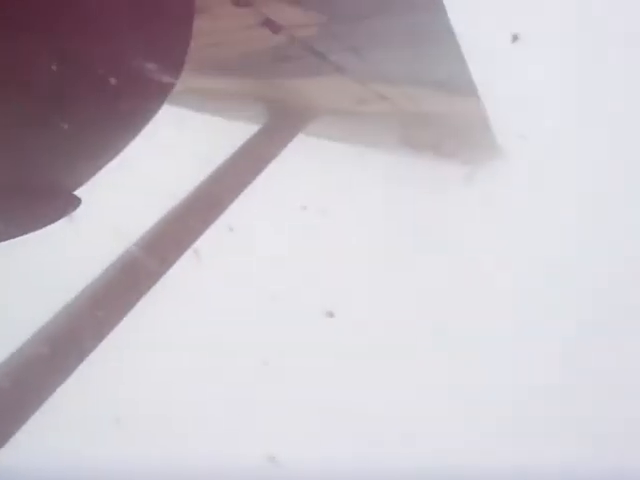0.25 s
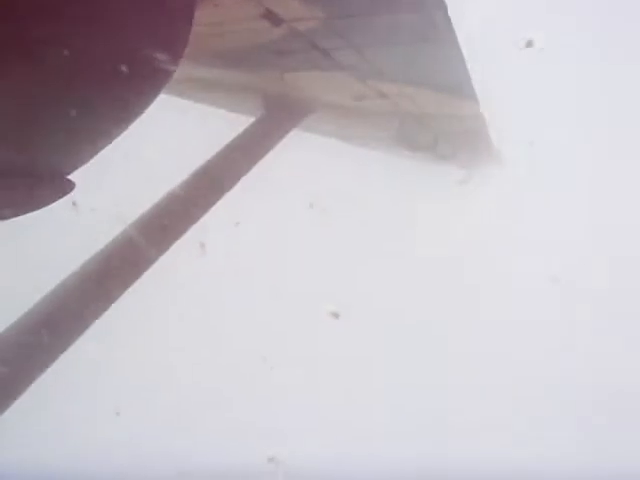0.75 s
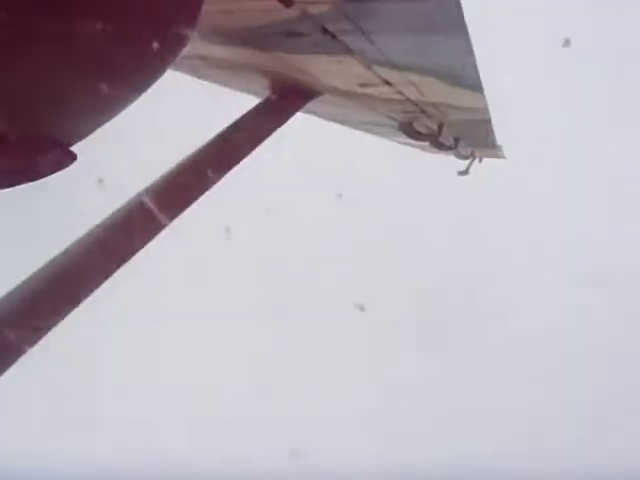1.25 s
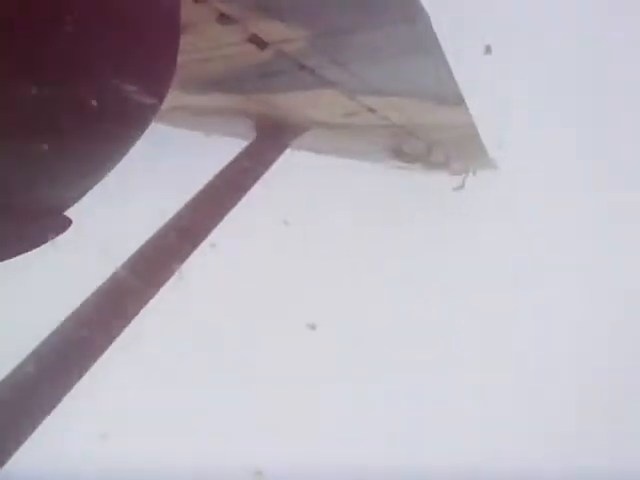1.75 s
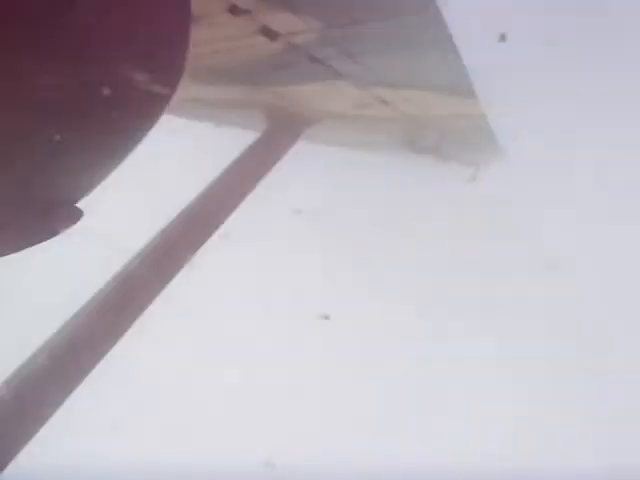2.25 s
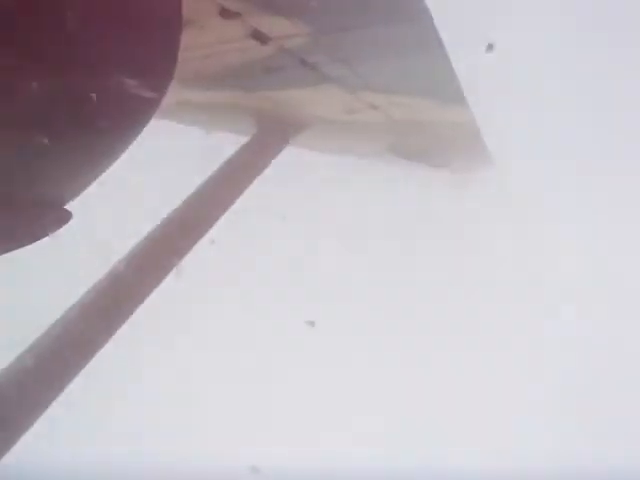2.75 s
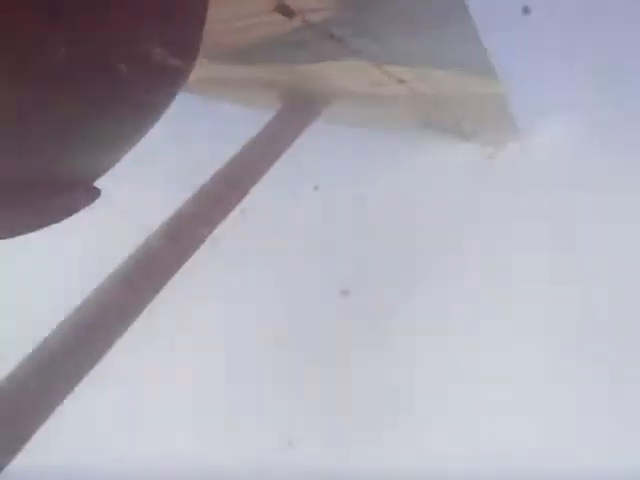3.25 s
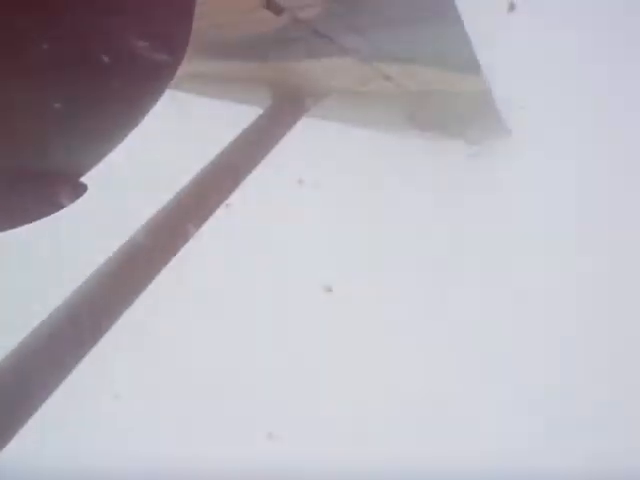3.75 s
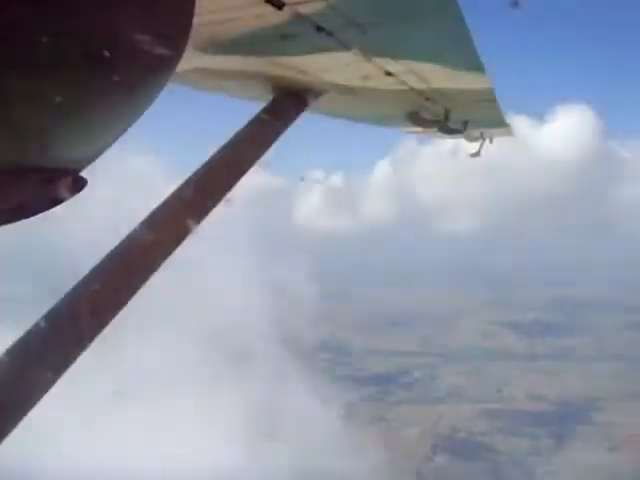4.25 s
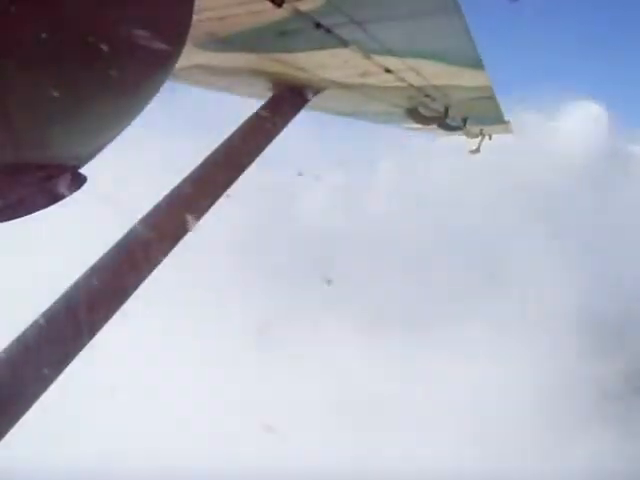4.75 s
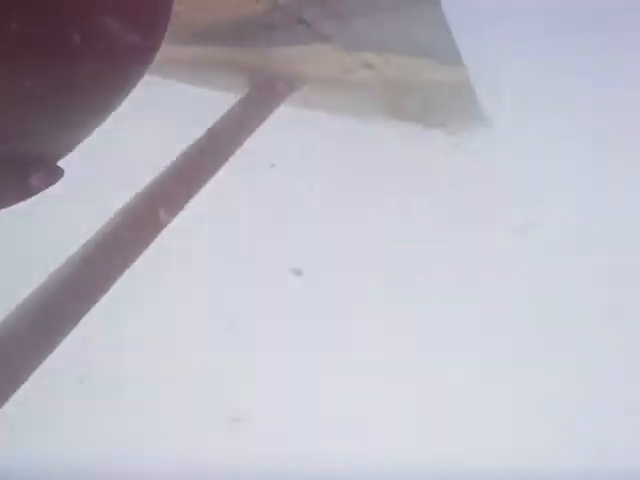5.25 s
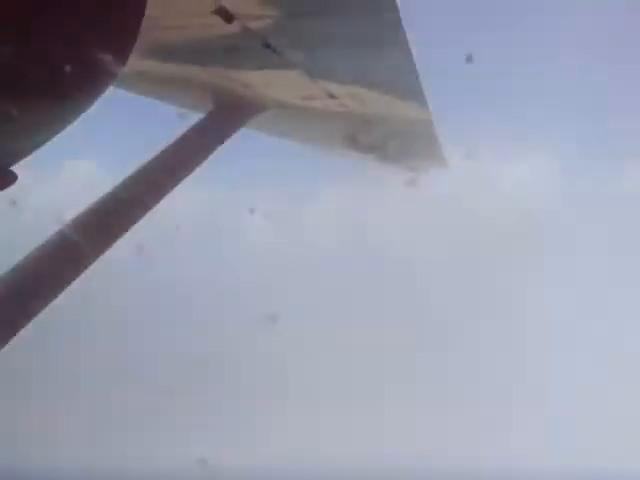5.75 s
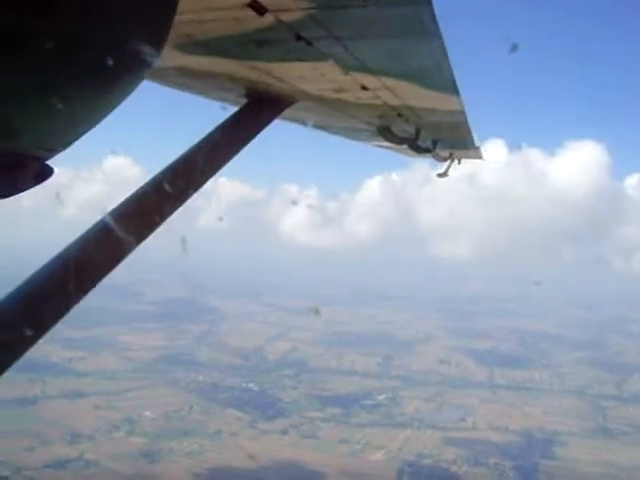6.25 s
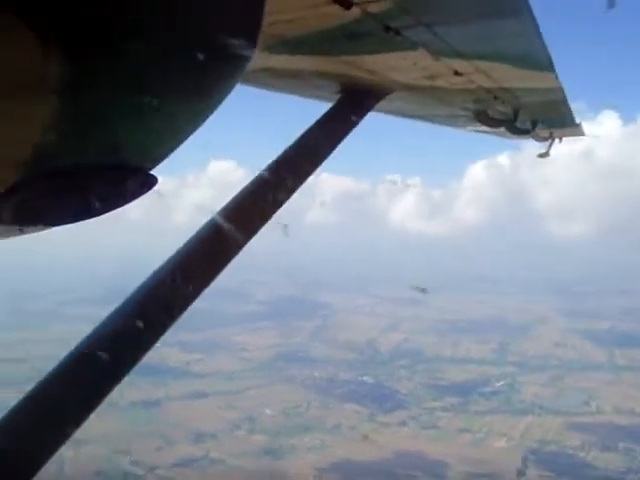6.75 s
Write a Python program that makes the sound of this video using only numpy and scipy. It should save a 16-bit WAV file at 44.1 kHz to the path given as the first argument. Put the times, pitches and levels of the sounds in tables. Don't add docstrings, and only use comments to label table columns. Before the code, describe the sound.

From 0 seconds a loud, dense propeller-aircraft drone fills the cabin: a low steady blade hum with its octave, mixed with booming, turbulent air against the hull. The small microphone is heavily overdriven, so the roar is squared off, buzzing, gritty and crackly, with thin deep bass. At about 0.46 seconds a nearby air jet opens suddenly, first thin and high, then a fuller rushing hiss from about 0.7, swelling around 0.9 and 1.4, thinning again near 1.5 and snapping shut at 1.7. Millisecond-long rough-air thumps, heard as dull pops in the distortion, fall near 0.5, 0.9 and 1.8 seconds, cluster between 3.2 and 4.3, and recur at 6.9. Otherwise the distorted drone holds level, only fluttering slightly, and continues to about 7 seconds without a fade or engine change.

```python
import sys
import numpy as np
from scipy import signal
from scipy.fft import rfft, irfft, next_fast_len
from scipy.io import wavfile
from scipy.ndimage import uniform_filter1d, map_coordinates

SR = 44100
rng = np.random.default_rng(int(sys.argv[2]) if len(sys.argv) > 2 else 0)


def master_out(mix):
    frames = np.transpose(np.atleast_2d(mix))
    ceiling = np.clip(frames, -1, 1)
    pcm = np.round(ceiling * 32767).astype(np.int16)
    wavfile.write(sys.argv[1], SR, pcm)


def boost(x):
    u = np.asarray(x, float) / 20
    return 10 ** u


N = 308683


def unit(x):
    return x / np.sqrt(np.mean(x ** 2) + 1e-20)


def along(points, hz):
    point_hz, value = np.transpose(points)
    return np.interp(np.log(hz + 1), np.log(point_hz + 1), value)


def wobble(rate):
    knots = rng.standard_normal(int(N * rate / SR) + 4)
    return map_coordinates(knots, [np.arange(N) * rate / SR])


def filtered(x, response):
    size = next_fast_len(N + 8192)
    spectrum = rfft(x, size) * response(np.fft.rfftfreq(size, 1 / SR))
    return irfft(spectrum, size)[..., :N]


def rush(spectrum):
    return unit(filtered(rng.standard_normal(N), lambda hz: boost(along(spectrum, hz))))


# frequency_hz, density_db (per Hz)
HULL_BOOM = [(20, -9.5), (70, -4.5), (90, -1.5), (120, -5), (170, -1.5), (255, -1.5), (305, -5.5),
             (350, -11), (480, -16), (690, -13.5), (790, -27.5), (1200, -30.5), (2000, -49), (4000, -46.5),
             (11000, -66)]


def slipstream():
    gust_db = 0.17 * wobble(2.965) + 0.65 * wobble(14) + 0.65 * wobble(70)
    return boost(gust_db) * rush(HULL_BOOM)


# multiple (of the blade rate), level_db
BLADE_TONES = [
    (1, -10),
    (2, -10.5),
]


def propellers():
    blade_hz, hunting_hz = 131, 0.5
    turns = np.cumsum(blade_hz + hunting_hz * wobble(1.5)) / SR
    tones = 0
    for multiple, level_db in BLADE_TONES:
        tones = tones + boost(level_db + 0.8 * wobble(2.52)) * np.sin(2 * np.pi * multiple * turns)
    return tones


# frequency_hz, density_db (per Hz)
WIDE_GAP = [(600, -3), (1500, 4), (2500, -4.5), (4300, 0), (5500, -1), (7200, -11.5), (11000, -46)]
# frequency_hz, density_db (per Hz)
NARROW_GAP = [(1000, 1.5), (2500, -7.5), (5000, -5.5), (8500, 3), (10000, -1.5), (12000, -31)]
# start_s, length_s, thin_share (of the thin high hiss, 0-1)
PINCHED_GAPS = [
    (0.507, 0.21, 0.7),
    (1.49, 0.21, 0.68),
]
# middle_s, rise_db, half_width_s
FLOW_SURGES = [
    (.89, 3, 0.085),
    (1.38, 2.5, 0.12),
]


def jet():
    open_s, shut_s, flow_db = 0.458, 1.69, -13
    rise_db_per_s, fall_db_per_s = 420, 650
    glide_s, pinch_db = 0.11, 5.5
    t = np.arange(N) / SR
    opening_db = rise_db_per_s * (t - open_s)
    shutting_db = fall_db_per_s * (shut_s - t)
    valve_db = np.minimum(0, np.minimum(opening_db, shutting_db))
    thin = 0.05
    for start_s, length_s, share in PINCHED_GAPS:
        inside_s = np.minimum(t - start_s, start_s + length_s - t)
        thin = thin + share * np.clip(0.5 + inside_s / glide_s, 0, 1)
    thin = np.clip(thin, 0, 1)
    surge_db = sum(rise_db * np.exp(-((t - s) / width_s) ** 2) for s, rise_db, width_s in FLOW_SURGES)
    level_db = flow_db + valve_db + pinch_db * thin + surge_db
    hiss = np.sqrt(1 - thin) * rush(WIDE_GAP) + np.sqrt(thin) * rush(NARROW_GAP)
    return boost(level_db + 0.52 * wobble(23)) * hiss


# middle_s, length_s
PRESSURE_BUMPS = [
    (0.471, 0.005),
    (.891, 0.0056),
    (1.778, 0.0061),
    (3.173, 0.0067),
    (3.343, 0.0058),
    (3.791, 0.0051),
    (4.029, .008),
    (4.301, 0.0052),
    (6.919, 0.0045),
]


def bumps():
    t = np.arange(N) / SR
    return boost(11) * sum(np.exp(-(2 * (t - s) / length_s) ** 4) for s, length_s in PRESSURE_BUMPS)


def scene():
    return boost(2.0) * (slipstream() + propellers() + jet() + bumps())[None]


def stored(over, share):
    total = np.cumsum(np.where(over > 0, share * over, over))
    return total - np.minimum.accumulate(np.minimum(total, 0))


def sticking(x, top, share_up, share_down, slew):
    up = stored(x - top, share_up)
    down = stored(-x - top, share_down)
    goal = np.where(up > down, top, np.where(down > 0, -top, x))
    return signal.lfilter([slew], [1, slew - 1], goal)


def capped(x, top, hardness):
    return x / (1 + np.abs(x / top) ** hardness) ** (1 / hardness)


def slope_grain(x):
    slope = np.sqrt(np.abs(uniform_filter1d(np.gradient(x, axis=1) ** 2, size=40)))
    return filtered(boost(-9) * slope * rng.standard_normal(N), lambda hz: hz < 12200)


# lower_edge_hz, threshold_db (relative to the usual level)
TREBLE_SLICES = [(12500, -4), (14300, -2), (15300, -.5)]


def treble_gate(x):
    wander_db = 3 * wobble(32)
    for edge_hz, open_db in TREBLE_SLICES:
        high = filtered(x, lambda hz: hz > edge_hz)
        power = np.abs(uniform_filter1d(high ** 2, size=600)) + 1e-16
        usual = np.exp(uniform_filter1d(np.log(power), size=8000))
        loud_enough = power > usual * boost(open_db + wander_db) ** 2
        kept = uniform_filter1d(1.0 * loud_enough, size=128)
        x = x - (1 - kept) * high
    return x


def band_limit(x):
    return signal.sosfilt(signal.butter(12, 16470, fs=SR, output="sos"), x)


# frequency_hz, gain_db
BAND_EDGE = [(8000, -0.5), (9600, 0), (10500, -0.5), (11300, -7), (12300, -17.5), (15700, -12),
             (15950, -60)]


def record(dry):
    squared = sticking(dry[0] + 0.1, top=0.55, share_up=0.019, share_down=0.004, slew=0.39)[None]
    sagging = filtered(squared, lambda hz: 1j * hz / (108 + 1j * hz))
    drift = 0.0089 + boost(-25.5) * rush([(12, 5), (28, -6), (45, 0), (70, -70.0)])
    ceiling = capped(sagging + drift, top=0.714, hardness=30.0)
    grainy = ceiling + slope_grain(ceiling)
    edged = filtered(grainy, lambda hz: boost(along(BAND_EDGE, hz) - BAND_EDGE[0][1]))
    finished = treble_gate(edged)
    return band_limit(finished)


dry = scene()
out = record(dry)
master_out(out)
```